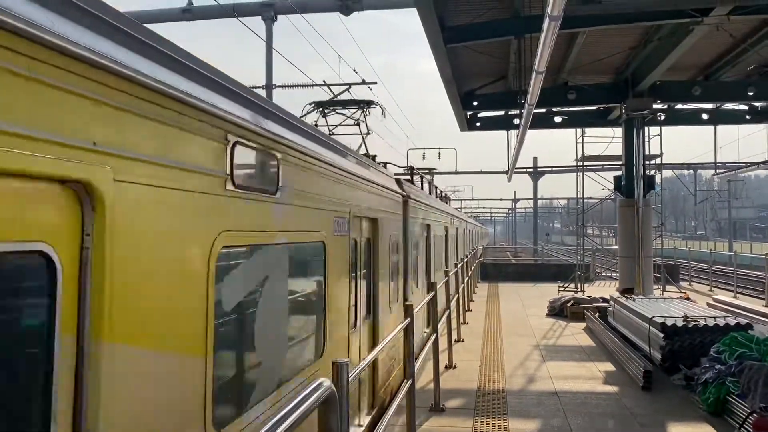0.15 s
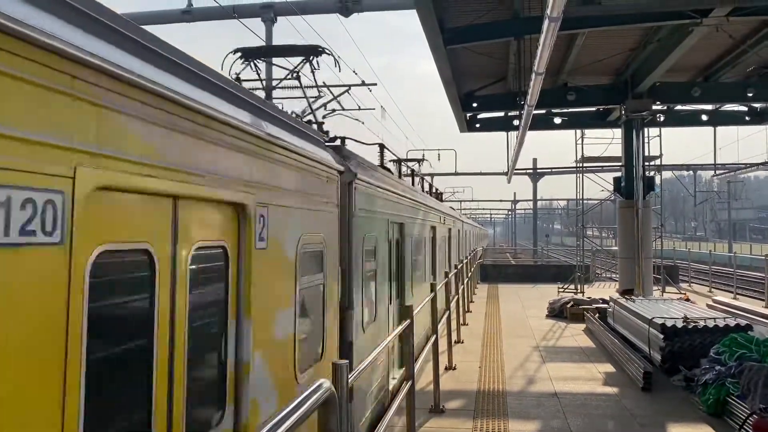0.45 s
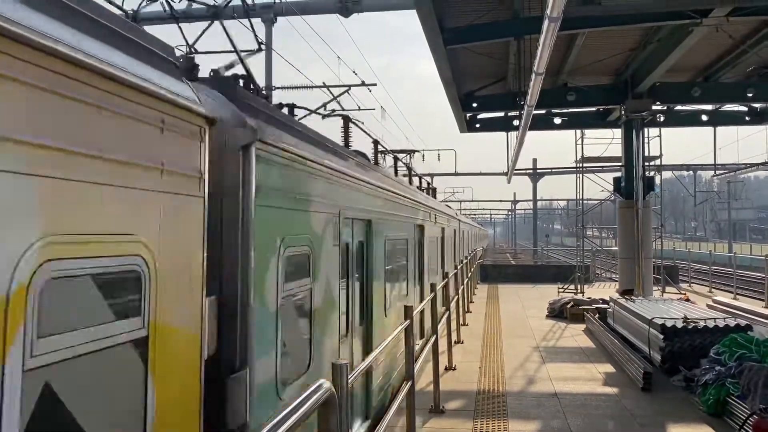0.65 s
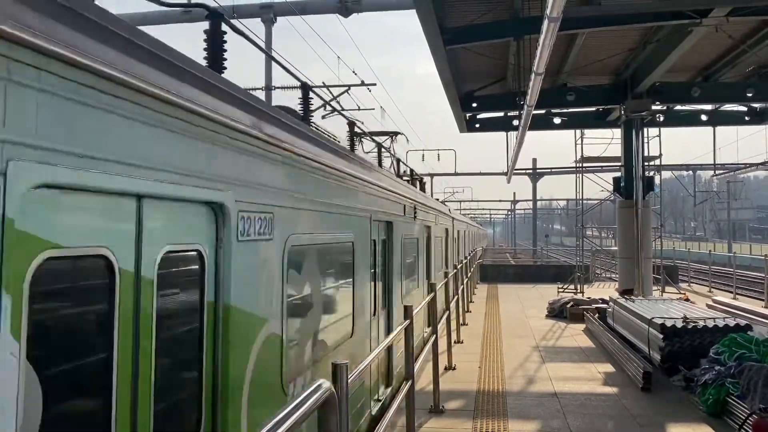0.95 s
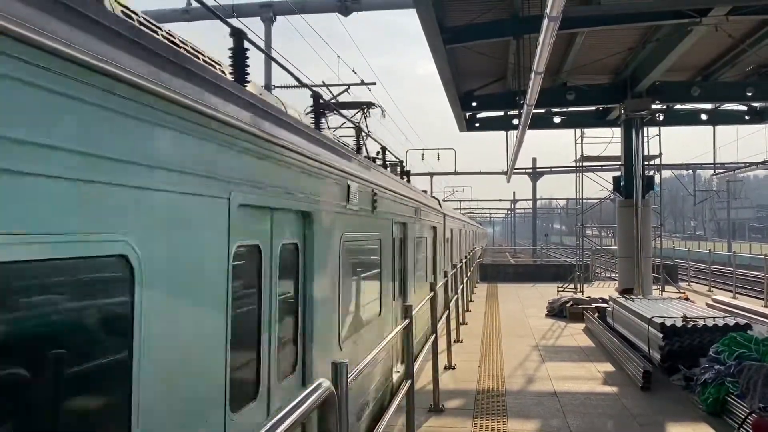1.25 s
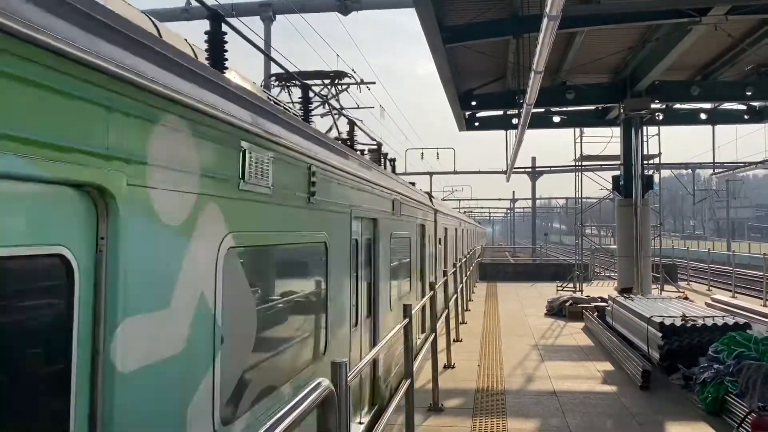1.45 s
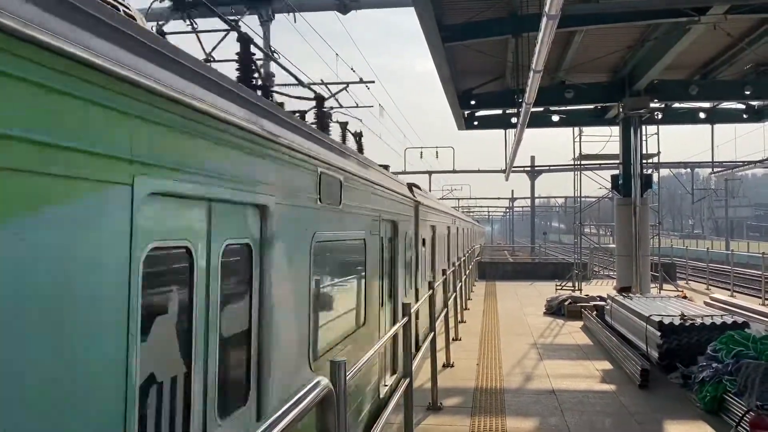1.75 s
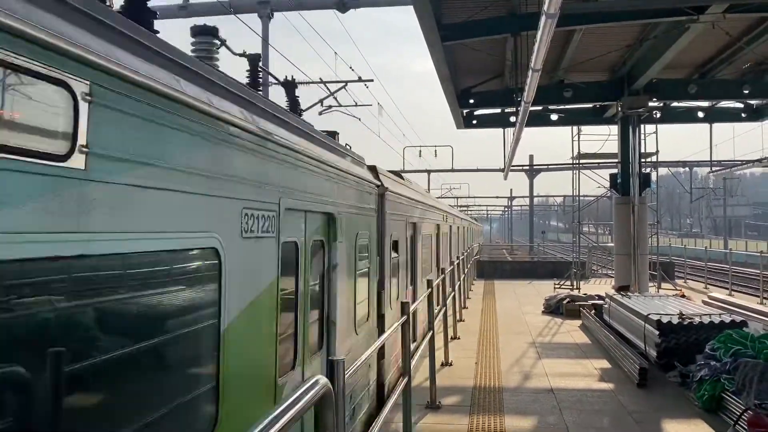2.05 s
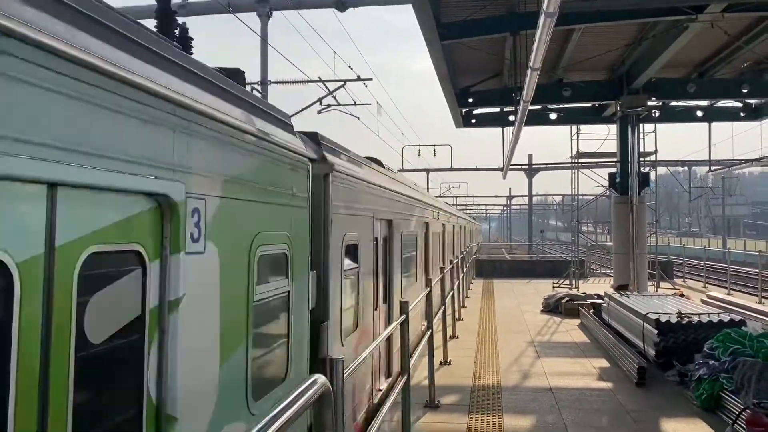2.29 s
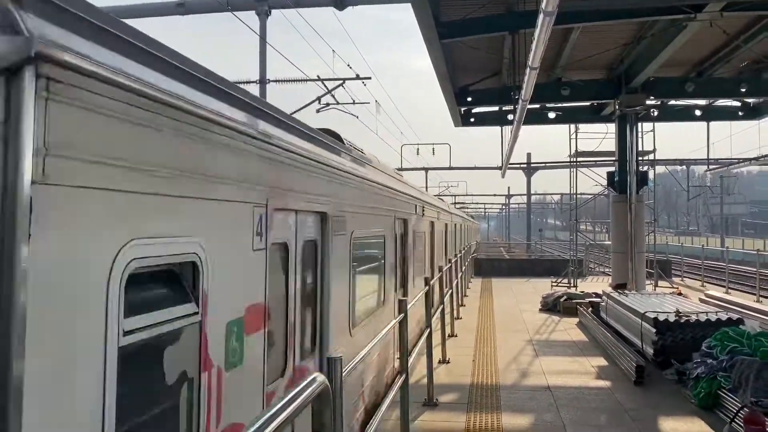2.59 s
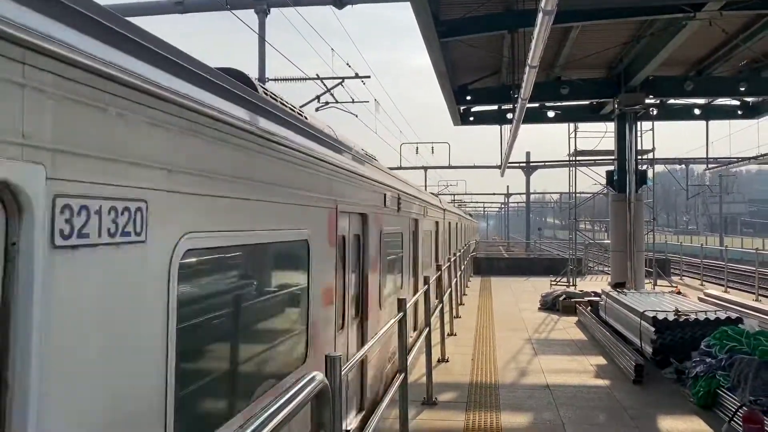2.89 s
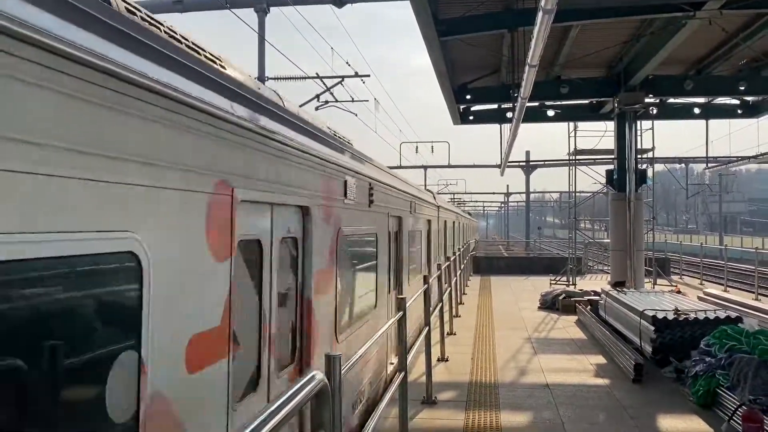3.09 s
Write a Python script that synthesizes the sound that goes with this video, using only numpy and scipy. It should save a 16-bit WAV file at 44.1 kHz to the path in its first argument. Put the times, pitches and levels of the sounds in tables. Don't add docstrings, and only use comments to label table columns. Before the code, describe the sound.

Passing electric train beside an outdoor platform: wheel roar, sinking gear whines, thumping gusts of air

```python
import sys
import numpy as np
from scipy import signal
from scipy.fft import rfft, irfft, next_fast_len
from scipy.io import wavfile
from scipy.ndimage import uniform_filter1d, map_coordinates

SR = 44100
rng = np.random.default_rng(int(sys.argv[2]) if len(sys.argv) > 2 else 0)


def master_out(mix):
    frames = np.transpose(np.atleast_2d(mix))
    ceiling = np.clip(frames, -1, 1)
    pcm = np.round(ceiling * 32767).astype(np.int16)
    wavfile.write(sys.argv[1], SR, pcm)


def to_linear_factor(level_db):
    exponent = np.asarray(level_db, float) / 20
    return 10 ** exponent


N = 142443

# (time [s], level [dB])
DRAUGHT_STRENGTH = [(0, -16.5), (.06, -13), (.13, -27), (.5, -27.5), (.7, -29), (.79, -20.5), (.85, -9.5),
                    (.91, -24.5), (1.04, -32), (1.1, -43), (1.6, -33), (1.8, -24.5), (1.94, -34),
                    (2.02, -23), (2.6, -22.5), (2.8, -28), (3.05, -24.5), (3.2, -28)]
# (frequency [Hz], density [dB per Hz])
BUFFET_COLOUR = [(20, -58), (40, -6.5), (110, 2.5), (200, -6), (300, -3), (450, -3.5), (900, -74)]
# (frequency [Hz], density [dB per Hz])
FLUTTER_COLOUR = [(150, -28), (300, 0.5), (550, 6), (800, 1.5), (1200, -14), (1600, -52), (2500, -102)]
# (time [s], peak [dB], frequency [Hz])
EDDIES = [(.01, -8, 395), (0.024, -11, 402), (0.038, -3.5, 146), (.063, 1, 199), (.073, -4, 240),
          (.113, -6, 114), (0.761, -6, 165), (.776, -2, 230), (0.825, -12.5, 1040), (0.805, -0.5, 136),
          (0.811, -5.5, 366), (0.828, 4.5, 280), (0.848, -6.5, 553), (0.855, -20, 288), (.867, -0.5, 235),
          (0.915, -11, 168), (.001, -2, 300), (1.009, -10.5, 143), (1.79, -14, 300), (2.11, -8, 421),
          (2.689, -22, 301), (2.713, -17.5, 260), (2.89, -27, 230), (2.926, -15, 200), (2.982, -12, 200),
          (3.004, -10.5, 233), (3.056, -11.5, 430), (3.102, -10.5, 250), (3.147, -13, 98),
          (3.169, -13.5, 86)]
# (time [s], peak [dB], frequency [Hz], length [s])
SWIRLS = [(.092, -10, 94.5, 0.013), (.202, -15.5, 170, 0.0065), (.177, -17, 89, 0.022),
          (.275, -20, 192, 0.013), (.309, -13.5, 155, .01), (.441, -28, 198, 0.012),
          (.716, -16.5, 99, 0.022), (.741, -17, 200, 0.0072), (.779, -7, 97, 0.017),
          (.839, -16, 180, 0.0064), (.901, -10.5, 173, 0.011), (.934, -11.5, 171, .012),
          (.968, -11.5, 124, 0.0089), (1.028, -14.5, 151, .016), (1.08, -23, 161, 0.014),
          (1.345, -21, 140, 0.017), (1.713, -13.5, 92, 0.013), (1.85, -18, 99, .016),
          (2.01, -19.5, 86, .018), (2.135, -22, 106, 0.014), (2.175, -22, 101, 0.016),
          (2.247, -18, 300, 0.008), (2.292, -19, 203, 0.025), (2.392, -18, 110, .012),
          (2.519, -20, 91, 0.013), (2.603, -21.5, 102, 0.027), (2.7, -19.5, 166, 0.027),
          (2.73, -20, 257, 0.012), (2.9, -21, 271, 0.042), (3.045, -15, 272, 0.0098),
          (3.125, -19, 98, .012), (3.196, -20.5, 89, 0.031), (.012, -10, 563, 0.0069),
          (.06, -12, 514, 0.0064), (3.16, -20, 260, 0.0099), (2.691, -11.5, 289, 0.011),
          (2.715, -13, 261, 0.014), (0.821, -6, 480, 0.0031), (.829, -17, 870, .005),
          (0.804, -11.5, 420, 0.011), (1.792, -13, 212, 0.01)]
# (time [s], level [dB])
ROLLING_STRENGTH = [
    (0.0, -39.5),
    (0.52, -38),
    (0.85, -38),
    (1.17, -40.5),
    (1.57, -40.5),
    (1.96, -39),
    (2.93, -43),
    (3.23, -45.5),
]
# (frequency [Hz], density [dB per Hz])
RUMBLE_COLOUR = [(18, -54), (32, -23), (50, 0), (81, 1), (103, 0), (125, -7), (250, -28), (400, -77)]
# (frequency [Hz], density [dB per Hz])
RAIL_COLOUR = [(100, -30), (170, -1.5), (310, -11), (430, -0.5), (560, -9), (760, -5), (1000, -15.5),
               (1500, -17), (2500, -100)]
# (frequency [Hz], density [dB per Hz])
WHEEL_COLOUR = [(530, -43), (900, -4.5), (1600, -5), (2500, -11), (5000, -21), (7100, -24.5), (9500, -30),
                (15600, -33.5)]
# (frequency [Hz], width [Hz], level [dB])
WHEEL_MODES = [(2120, 300, 2.5), (2930, 420, 5), (3650, 250, 2), (4450, 550, 2.5), (5250, 400, 1.5)]
# (time [s], pitch [Hz], level [dB])
LOW_GEAR = [(0, 456, -56), (.22, 454, -46), (.35, 452, -20.5), (.47, 451, -26), (.64, 447, -15.5),
            (.76, 445, -25.5), (.93, 441, -29), (1.12, 437, -36), (1.25, 434, -39), (1.36, 432, -34.5),
            (1.64, 428, -19), (1.68, 426, -20.5), (1.97, 420, -19.5), (2.01, 417, -29), (2.32, 411, -15),
            (2.44, 408, -17.5), (2.48, 406, -29), (3.23, 390, -47.5)]
# (time [s], pitch [Hz], level [dB])
HIGH_GEAR = [(0, 768, -26.5), (.135, 765, -39), (.15, 764, -23), (.22, 763, -19), (.325, 755, -21),
             (.36, 754, -34), (.46, 757, -27), (.54, 757, -33), (.69, 754, -30), (.93, 745, -36.5),
             (1.33, 730, -40), (1.47, 720.8, -44), (1.6, 718, -34), (1.75, 712, -38), (1.79, 710, -28.5),
             (2.2, 695, -26.5), (2.4, 686, -29), (2.69, 663, -34), (2.75, 660, -41)]
# (multiple, level [dB])
LOW_ORDERS = [(1, -2), (2, -14), (3, -28)]
# (multiple, level [dB])
HIGH_ORDERS = [(1, -1.5), (2, -27), (3, -31.5), (4, -25.5)]
# (time [s], level [dB])
OVERTONE_LOAD = [
    (0, -43),
    (.4, -21),
    (1.1, 11.5),
    (1.7, -7),
    (1.9, -2.5),
    (2.1, 5),
    (2.4, -6),
    (3.23, 1),
]
# (time [s], depth [dB])
LOW_NULLS = [(.322, 14), (.375, 22), (0.451, 32), (.51, 6.5), (0.577, 32), (0.662, 10), (.77, 12),
             (1.479, 20.5), (1.526, 13), (1.568, 16), (1.615, 23), (1.645, 16.5), (1.84, -2), (2.0, 6),
             (2.078, -4), (2.16, -2), (2.288, 15), (2.367, 10), (2.465, 6)]
# (time [s], depth [dB])
HIGH_NULLS = [(.18, 14), (.375, 8), (.45, 10), (.51, 27), (.585, 15), (.645, 8), (1.866, 12), (2.014, 9.2),
              (2.161, 15), (2.25, 9), (2.31, 9.6), (2.44, 14), (2.54, 10)]
# (time [s], pitch [Hz], level [dB])
MOTOR_WHINE = [
    (1.55, 1455, -70),
    (1.67, 1452, -44),
    (1.8, 1446, -42),
    (1.95, 1434, -43),
    (2.03, 1426, -52),
    (2.2, 1415, -70),
]
# (time [s], pitch [Hz], level [dB])
HOUSING_TONE = [
    (1.55, 2170, -70),
    (1.63, 2165, -48),
    (1.78, 2140, -62),
    (1.97, 2110, -46),
    (2.05, 2095, -56),
    (2.6, 2040, -58),
]
# (time [s], pitch [Hz], level [dB])
WHEEL_SING = [
    (1.8, 2900, -66),
    (2.15, 2870, -50),
    (2.7, 2900, -54),
    (3.23, 2880, -53),
]
# (frequency [Hz], likeness [0-1])
TRAIN_ALIKE = [(60, 0.95), (130, 0.81), (290, 0.33), (640, 1), (1410, 0.18), (3100, 0.58), (5500, 0.47),
               (7500, 0.43), (15000, 0.26)]
# (frequency [Hz], lead [radians])
LEFT_LEAD = [(0, 0), (950, 0.96), (2240, 6), (6900, 6.5), (15000, -6.5)]
# (frequency [Hz], difference [dB])
LEFT_LEAN = [(60, -0.5), (110, -2.5), (200, 2), (380, -4.5), (700, 2), (1290, -0.5), (2380, 2.0), (4400, 3),
             (8120, -0.5), (15000, 0.5)]
# (from [Hz], to [Hz], level [dB])
SUM_GAPS = [(8700, 9600, -20), (8300, 8700, -5), (12500, 13750, -16), (13750, 15150, -3.5),
            (15150, 20000, -7)]
# (from [Hz], to [Hz], level [dB])
DIFFERENCE_GAPS = [(6800, 7450, -10), (10400, 11700, -14), (14500, 20000, -14)]


def unit(x):
    return x / np.sqrt(np.mean(np.abs(x) ** 2) + 1e-20)


def along(points, hz):
    f, v = np.transpose(points)
    return np.interp(np.log(hz + 1), np.log(f + 1), v)


def curves(rows):
    s, *cols = np.transpose(rows)
    return [np.interp(np.arange(N) / SR, s, c) for c in cols]


def wobble(rate):
    coarse = np.arange(0, N + 32, 32)
    curve = map_coordinates(rng.standard_normal(1000), [coarse * rate / SR])
    return np.interp(np.arange(N), coarse, curve)


def filtered(x, response):
    m = next_fast_len(N + SR // 2)
    return irfft(rfft(x, m) * response(np.fft.rfftfreq(m, 1 / SR)), m)[..., :N]


def ports(pair, alike):
    m = next_fast_len(N + SR // 2)
    hz = np.fft.rfftfreq(m, 1 / SR)
    turn = np.arccos(np.clip(along(alike, hz), -1, 1)) / 2
    mid, side = rfft(pair, m) * [np.cos(turn), np.sin(turn)]
    lead = np.interp(hz, *np.transpose(LEFT_LEAD))
    half = to_linear_factor(along(LEFT_LEAN, hz) / 2) * np.exp(.5j * lead)
    return irfft([(mid + side) * half, (mid - side) / half], m)[:, :N]


def rush(colour_db, patchy_db):
    hz, _, z = signal.stft(rng.standard_normal((2, N)), SR, nperseg=1024, noverlap=768)
    field = uniform_filter1d(rng.standard_normal(z.shape[1:]), size=8, axis=0)
    field = uniform_filter1d(field, size=12, axis=1)
    patchy = z * to_linear_factor(patchy_db * unit(field))
    pair = signal.istft(patchy, nperseg=1024, noverlap=768)[1][:, :N]
    return unit(filtered(pair, lambda hz: to_linear_factor(colour_db(hz))))


def turbulence(colour, level_db, grows):
    draught_db, = curves(DRAUGHT_STRENGTH)
    peak_db = draught_db.max()
    gust = to_linear_factor(level_db + peak_db + grows * (draught_db - peak_db))
    lumps = to_linear_factor(1.66 * wobble(60)) * rush(lambda hz: along(colour, hz), patchy_db=1.0)
    return gust * unit(lumps)


def eddies():
    level_db, edge_db, side_db, wide_hz, cycles = -4.5, -21.5, -4, 300, 0.96
    out, pad = np.zeros((2, N + SR)), SR // 20
    t = np.arange(-pad, pad) / SR
    whirls = [(s, db, hz, cycles / np.sqrt(210 * hz)) for s, db, hz in EDDIES] + SWIRLS
    chances = rng.uniform(-0.73, 1, (len(whirls), 2))
    for (s, db, hz, length), (phase, lean) in zip(whirls, chances):
        turn = np.exp(2j * np.pi * hz * t + 1j * np.pi * phase)
        swell = to_linear_factor(db + level_db) * np.exp(-2 * (t / length) ** 2)
        wavelet = swell * (turn + to_linear_factor(edge_db) * turn ** 3)
        side = to_linear_factor(side_db) * min(hz / wide_hz, 1) * lean * wavelet.imag
        out[:, round(s * SR):][:, :len(t)] += [wavelet.real, side]
    mid, side = out[:, pad:N + pad]
    return mid + side * [[1], [-1]]


def draught():
    buffet = turbulence(BUFFET_COLOUR, level_db=-5.5, grows=0.86)
    flutter = turbulence(FLUTTER_COLOUR, level_db=-6.5, grows=1.345)
    return ports(buffet + flutter, [(30, 1.0), (250, 0.54), (1000, 0.28)]) + eddies()


def platform_rumble():
    return to_linear_factor(-34 + 0.33 * wobble(4.25)) * rush(lambda hz: along(RUMBLE_COLOUR, hz), patchy_db=0.8)


def rail_roar():
    roll_db, = curves(ROLLING_STRENGTH)
    swell_db = roll_db.mean() + 2.68 * (roll_db - roll_db.mean())
    return to_linear_factor(swell_db + 9.5 + 0.81 * wobble(7.5)) * rush(lambda hz: along(RAIL_COLOUR, hz), patchy_db=3.0)


def wheel_hiss():
    def ringing(hz):
        modes = sum(db * np.exp(-(2 * (hz - c) / w) ** 2) for c, w, db in WHEEL_MODES)
        return along(WHEEL_COLOUR, hz) + modes

    roll_db, = curves(ROLLING_STRENGTH)
    return to_linear_factor(roll_db + 1.34 + 0.35 * wobble(8.3)) * rush(ringing, patchy_db=1.32)


def whine(table, orders, nulls, blur_hz, steady):
    null_s = 0.0087
    hz, db = curves(table)
    load_db, = curves(OVERTONE_LOAD)
    t = np.arange(N) / SR
    db = db - sum(depth_db * np.exp(-((t - s) / null_s) ** 2) for s, depth_db in nulls)
    turns = np.cumsum(hz) / SR

    def beat(k):
        return unit(steady / k + 0.68 * wobble(blur_hz) + 1.4j * wobble(blur_hz))

    pair = 0
    for k, order_db in orders:
        tone = np.real(np.exp(2j * np.pi * k * turns) * [beat(k), beat(k)])
        pair = pair + to_linear_factor(order_db + load_db * (k > 1)) * tone
    return np.sqrt(2) * to_linear_factor(db) * pair


def brake_tones():
    wheel = whine(WHEEL_SING, [(1, 0)], [], blur_hz=170, steady=.3)
    housing = whine(HOUSING_TONE, [(1, 0)], [], blur_hz=40, steady=1.2)
    motor = to_linear_factor(1.5) * whine(MOTOR_WHINE, [(1, 0)], [], blur_hz=24, steady=3)
    return wheel + housing + motor


def gear_whines():
    low = whine(LOW_GEAR, LOW_ORDERS, LOW_NULLS, blur_hz=59.7, steady=3.2)
    high = to_linear_factor(.8) * whine(HIGH_GEAR, HIGH_ORDERS, HIGH_NULLS, blur_hz=50, steady=3)
    return low + high


def scene():
    air = draught()
    rolling = platform_rumble() + rail_roar() + wheel_hiss()
    train = rolling + brake_tones() + gear_whines()
    return air + ports(train, TRAIN_ALIKE)


def gap_gain(hz, bands):
    edge_hz = 60
    return to_linear_factor(sum(db * np.clip(np.minimum(hz - lo, hi - hz) / edge_hz + .5, 0, 1) for lo, hi, db in bands))


def band_limit(x):
    return signal.sosfilt(signal.butter(12, 15760, fs=SR, output="sos"), x)


def record(dry):
    ceiling = .85
    left, right = dry / (1 + np.abs(dry / ceiling) ** 4) ** .25
    mid, side = filtered(np.array([left + right, left - right]) / 2,
                         lambda hz: np.array([gap_gain(hz, SUM_GAPS), gap_gain(hz, DIFFERENCE_GAPS)]))
    mix = np.array([mid + side, mid - side])
    return band_limit(mix)


dry = scene()
out = record(dry)
master_out(out)
```